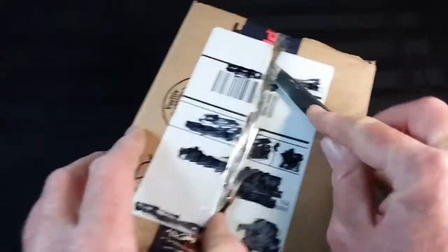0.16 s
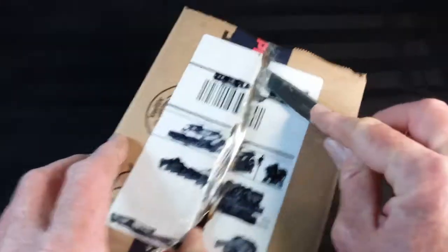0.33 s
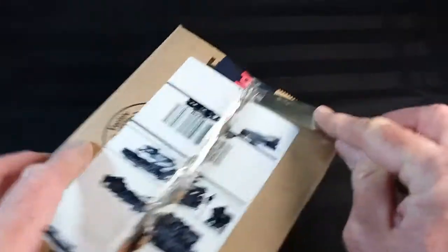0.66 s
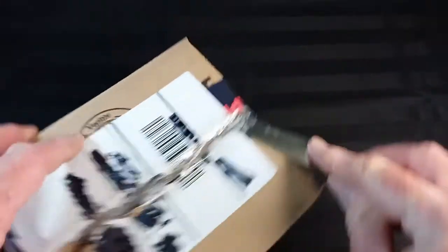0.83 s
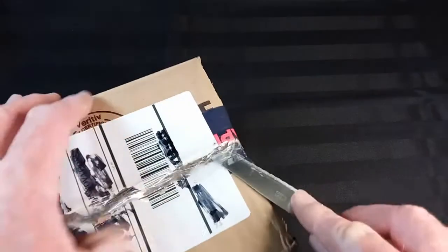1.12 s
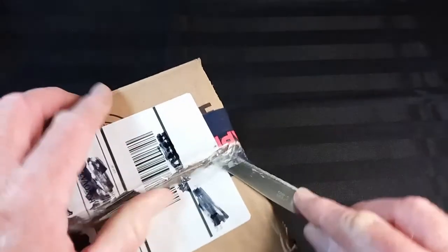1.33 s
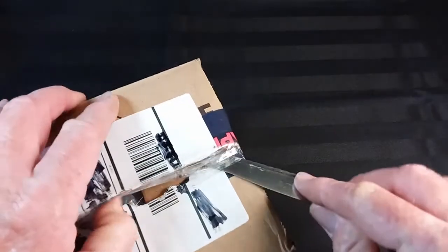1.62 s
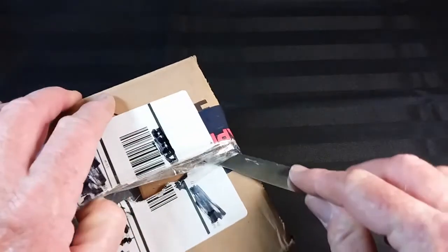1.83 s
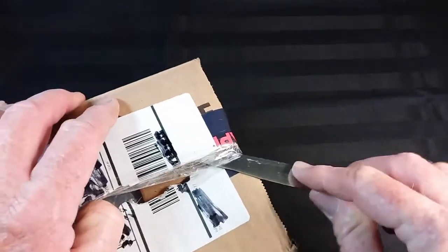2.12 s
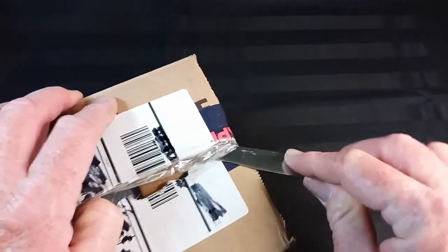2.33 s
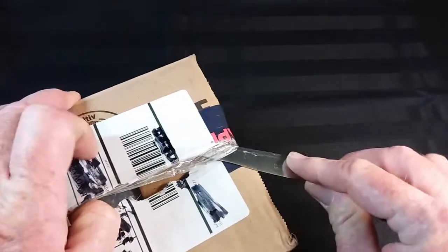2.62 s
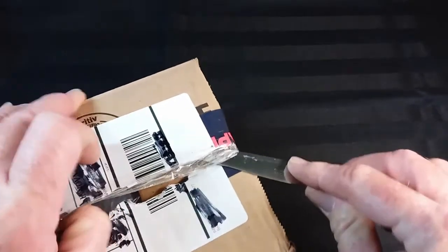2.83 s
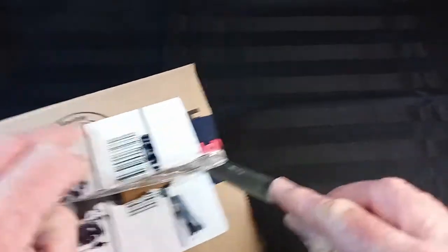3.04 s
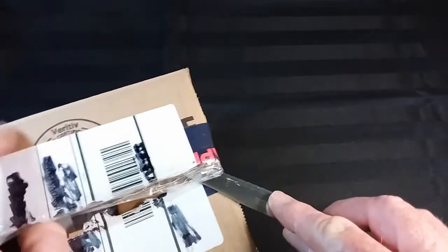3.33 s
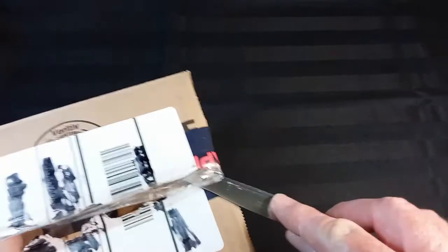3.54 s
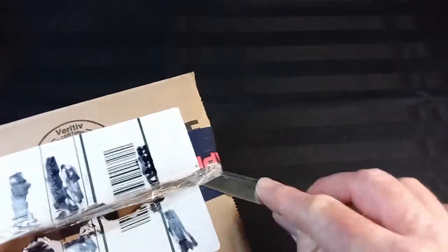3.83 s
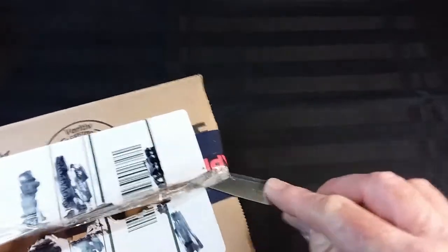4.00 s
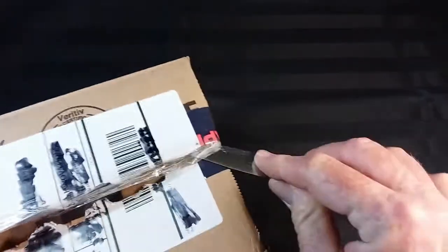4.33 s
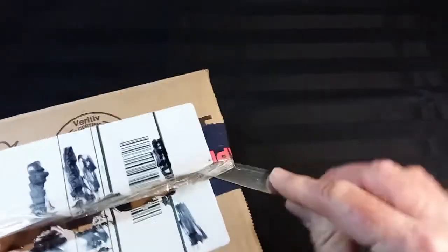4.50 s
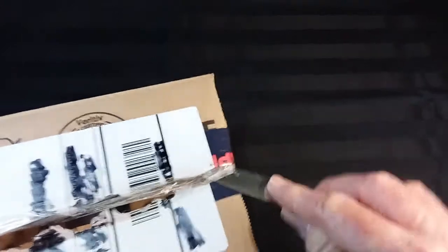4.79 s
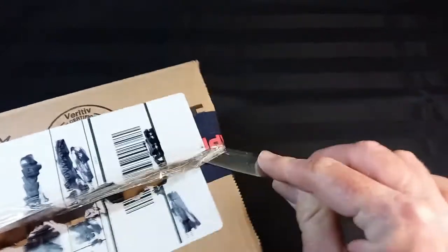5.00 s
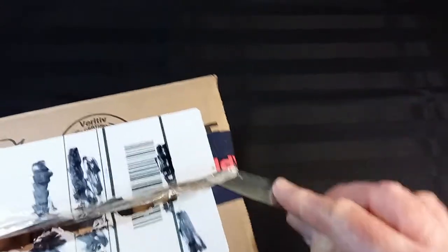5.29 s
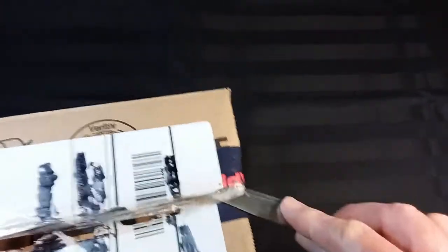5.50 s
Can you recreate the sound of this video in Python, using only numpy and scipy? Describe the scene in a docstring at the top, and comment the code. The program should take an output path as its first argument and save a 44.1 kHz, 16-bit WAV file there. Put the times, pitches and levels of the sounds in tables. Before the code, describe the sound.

Close and almost mono, in a quiet room with a very short echo, a knife blade works under packing tape on a cardboard box. From 0 to 0.5 s there are brisk scratches and hollow knocks, with bright clicks and a hard snap near 0.5. Lighter rubbing continues until a crisp snap around 0.95 and the loudest crack at about 1.2, with box bumps between. From 1.3 to 2.6 it is sparse: faint rubs, a small tick or two near 2.15. At 2.7 stronger dry scraping begins, with short rasps around 3.0-3.2 and a long drag to 3.55. Heavy hollow thumps cluster at 3.7-3.8 with snaps, then small crackles and softer scuffs follow, with a sharp tick at 4.75. Light rubbing and little pops fade on, ending with a scrape and low bump near 5.6. A low murmur and very faint, slowly rising whine lie beneath.

```python
"""In a quiet room, close to the microphone, a small knife works under clear packing tape on a cardboard box.
Blade and fingers scratch over tape and label: uneven friction noise drives film, cardboard and box.
The tape rasps, crackles and snaps in short ringing bursts; the hollow box thumps through its panel resonances.
A faint whine, a wavering sine, drifts upward over the room's murmur of filtered noise.
A short echo and tail surround the box, and the sound is almost mono."""
import sys
import numpy as np
from scipy import signal
from scipy.fft import rfft, irfft, next_fast_len
from scipy.io import wavfile
from scipy.ndimage import uniform_filter1d, map_coordinates

SR = 44100
rng = np.random.default_rng(int(sys.argv[2]) if len(sys.argv) > 2 else 0)


def waveform_to_disk(signal):
    """Save audio, clipped to [-1, 1], as 16-bit WAV at the path in sys.argv[1]."""
    frames = np.transpose(np.atleast_2d(signal))
    scaled = np.clip(frames, -1, 1) * 32767
    samples = np.round(scaled).astype(np.int16)
    wavfile.write(sys.argv[1], SR, samples)


N = 249311  # samples

# room air, tone colour: pitch_hz, level_db
AIR_COLOUR = [(25, -9), (87, 10.5), (232, -15), (400, 8.5), (700, -120)]
# thin tone before its wavering: time_s, pitch_hz, level_db
WHINE_PATH = [(0, 875, -74), (3, 880, -74), (4.8, 930, -69), (5.65, 935, -67)]
# the box is pressed or knocked: start_s, level_db (peak of the panels), pitch_hz (panel), skin_share_db
BOX_KNOCKS = [(0.168, -25, 554, 3.5), (0.208, -19.5, 486, -1.5), (0.22, -24, 227, -6),
              (0.308, -18.5, 390.5, 2.5), (0.372, -29.5, 485.4, -1), (0.958, -33, 185, 12),
              (1.019, -25, 172, -33.5), (1.057, -24, 234.2, -11), (1.092, -28, 267.5, -7),
              (1.211, -34.5, 200, 11), (1.262, -29.5, 584.6, 2.5), (1.475, -39.5, 516.5, 8.5),
              (1.498, -36.5, 514, 9), (1.508, -29.5, 550, 3.5), (1.68, -40, 320, -15),
              (2.2, -34, 296, -7.5), (2.727, -28.5, 689, 2), (3.301, -30.5, 150, 6),
              (3.697, -16, 242.1, -11.5), (3.750, -21, 222, -35), (3.764, -18.5, 252, -15.5),
              (3.805, -27, 229.5, -29), (3.927, -30.5, 250, -7), (4.241, -26.5, 195.9, -21.5),
              (4.264, -30.5, 375, -11.5), (4.427, -29.5, 693, -33), (4.56, -30, 365, 0),
              (4.741, -30, 380, -3), (4.764, -31, 204, -1), (4.809, -27.5, 684, -26.5),
              (4.904, -36.5, 340.3, 4), (5.181, -34.5, 196, -12.5), (5.305, -36, 198, -30.5),
              (5.634, -27.5, 248, -11)]
# resonances of the box panels: pitch_hz, width_hz, level_db (before the place of contact counts)
BOX_PANELS = [(151.7, 43, 8), (221.8, 38.6, 3.5), (297.4, 52, 4.5), (360, 79.6, 7), (397, 110, 1.5),
              (530.6, 35, 6.5), (714, 140, 1.5)]
# resonances of the cardboard skin: pitch_hz, width_hz, level_db
CARDBOARD_SKIN = [(514, 320, 1), (890, 272, 6.5), (1166, 156, 7), (1380, 139, 11), (1580, 1190, 1)]
# the tape lets go: start_s, level_db (peak before the hollow cut), pitch_hz (ring)
TAPE_SNAPS = [(0.0889, -16, 5340), (0.1128, -21, 884), (0.1257, -20.5, 6520), (0.312, -17, 2530),
              (0.3747, -20.5, 6400), (0.47, -18, 9080), (0.4853, -4, 9200), (0.936, -21, 7010),
              (0.9619, -10.5, 2560), (1.2148, -2.5, 3850), (1.9, -28.5, 6450), (2.076, -45.5, 2540),
              (2.142, -18.5, 2490), (2.1432, -21.5, 3700), (2.188, -31.5, 8800), (2.1951, -27.5, 2404),
              (2.7301, -17, 3000), (2.7565, -22, 3450), (3.104, -16, 3570), (3.6535, -23.5, 2976),
              (3.699, -19, 7549), (3.7722, -20, 5940), (3.865, -35.5, 4005), (3.8854, -29, 3700),
              (3.961, -28, 1300), (3.9891, -29, 3670), (4.0125, -31.5, 2530), (4.054, -25, 1265),
              (4.245, -22, 4390), (4.3831, -23.5, 3320), (4.4029, -19, 7550), (4.562, -27, 2788),
              (4.591, -34.5, 3080), (4.7432, -27.5, 3680), (4.7625, -12.5, 8040), (4.949, -24, 3030),
              (5.008, -29.5, 2520), (5.03, -26.5, 2300), (5.063, -23, 1090), (5.09, -28.5, 799),
              (5.511, -30.5, 9480), (5.585, -25, 3750)]
# short rasps of the edge across the film: start_s, length_s, level_db, pitch_hz (colour)
EDGE_RASPS = [(0.024, 0.035, -31, 13520), (0.0563, 0.005, -23, 13000), (0.33, 0.0085, -37, 3970),
              (1.804, 0.04, -52.5, 8950), (2.524, 0.084, -60, 3440), (3.0108, 0.0029, -22, 3100),
              (3.177, 0.019, -27.5, 3750), (3.203, 0.016, -30, 4300), (3.228, 0.016, -27.5, 2803)]
# each drag of blade or finger: start_s, hold_s, level_db (scratch), weight_db (on the box)
HAND_DRAGS = [(0, 0.047, -41, 2), (0.141, 0.14, -47, 3.5), (0.307, 0.03, -40, 5.5),
              (0.454, 0.066, -42.5, -3), (0.588, 0.075, -47, -10.5), (0.725, 0.16, -45.5, -12.5),
              (0.962, 0.066, -49.5, -1), (1.079, 0.12, -49.5, -4.5), (1.225, 0.066, -50, 3.5),
              (1.344, 0.147, -63, 1.5), (1.471, 0.07, -51, 3.5), (1.637, 0.072, -57.5, 1),
              (2.197, 0.01, -53.5, 9), (2.311, 0.0487, -57, -0.5), (2.415, 0.035, -52, -8),
              (2.744, .29, -40.5, -10), (2.81, 0.02, -33.5, -12.5), (3.112, 0.027, -43, -8),
              (3.188, 0.05, -34.5, -5), (3.348, 0.19, -38.5, -7.5), (3.599, 0.1242, -45, -3),
              (3.928, 0.11, -54.5, 4.5), (4.06, 0.063, -45, -1.5), (4.369, 0.024, -49, 0),
              (4.447, 0.0202, -49.5, 4), (4.563, 0.037, -50.5, 3), (4.767, 0.058, -46, -2),
              (4.878, 0.24, -54, 0), (5.203, 0.31, -52.5, -10.5), (5.597, .1, -44, 2)]
# resting hands, one level for each layer: scratch_db, rustle_db, rumble_db
RESTING_HANDS = [-67.5, -70, -67]
# film scratch, tone colour: pitch_hz, level_db
SCRATCH_COLOUR = [(1530, -14.5), (2820, 2), (4190, 1), (5530, -3), (7570, -3), (9470, 1.5), (10600, -11.5),
                  (13200, -8.5), (15500, -13)]
# hollow box rumble, tone colour: pitch_hz, level_db
RUMBLE_COLOUR = [(30, -27.5), (183, -2), (362, -8.5), (471, -9.5), (700, -14.5), (910, -17), (1540, -120)]

AIR_DB = -67.5
TOP_HZ = 15800  # band limit of the microphone
CRACK_GROWS = 0.26  # dB of broad crack over the ring per dB of peak: hard snaps are broad, soft ones ring
RISE_DB_PER_S, FALL_DB_PER_S = 448, 182.5  # a drag bites fast and trails off
SKIN_DB, SKIN_SHARE = -2.5, 0.54  # skin rustle over the scratch, and how much of the weight it feels
RATTLE_DB, RATTLE_DB_PER_S = -22, 167  # a knocked box keeps rumbling: start relative to the knock, decay
# A light rub is hollow around GAP_HZ; a rustle above TEAR_DB fills the gap.
GAP_HZ, GAP_WIDTH_HZ, GAP_DEPTH, TEAR_DB = 2030, 630, 0.95, -55.5
STEP = 64  # samples between the points of the handling curves


def amp(db):
    """Gain of a level in dB."""
    return 10 ** (np.asarray(db) / 20)


def unit(x):
    """x at rms 1."""
    return x / np.sqrt(np.mean(x ** 2) + 1e-20)


def peak(x):
    """x with its highest swing at 1."""
    return x / np.max(np.abs(x))


def add(track, s, sound):
    """Mix a sound in at time s, cut off at the end of the track."""
    part = track[round(s * SR):][:len(sound)]
    part += sound[:len(part)]


def curves(rows):
    """One value per sample for each column after the time, in straight lines."""
    s, *cols = np.transpose(rows)
    return [np.interp(np.arange(N) / SR, s, c) for c in cols]


def wobble(rate):
    """A smooth random curve with rate knots a second."""
    knots = rng.standard_normal(int(N * rate / SR) + 4)
    return map_coordinates(knots, [np.arange(N) * rate / SR])


def filtered(x, response):
    """x shaped by a complex response of frequency."""
    m = next_fast_len(x.shape[-1] + 4096)  # silence added so that ringing does not wrap round
    return irfft(rfft(x, m) * response(np.fft.rfftfreq(m, 1 / SR)), m)[..., :x.shape[-1]]


def resonances(modes):
    """Causal response of (Hz, width, dB) resonances, added with alternating sign."""
    def response(f):
        total = 0
        for k, (centre, width, db) in enumerate(modes):
            mode = 1j * f * width / (centre * centre - f * f + 1j * f * width)
            total = total + (-1) ** k * amp(db) * mode
        return total
    return response


def ring(hz, width):
    """A steep single resonance: the same one twice in a row."""
    return lambda f: resonances([(hz, width, 0)])(f) ** 2


def colour(points):
    """Causal (minimum phase) response through (Hz, dB) points, with levels held at -60 dB or more."""
    def response(hz):
        f, db = np.transpose(points)
        curve_db = np.interp(np.log(hz + 1), np.log(f), np.maximum(db, -60))
        # Folding the cepstrum onto positive times gives the minimum phase.
        ceps = irfft(np.log(amp(curve_db)))
        half = len(ceps) // 2
        ceps[1:half] *= 2
        ceps[half + 1:] = 0
        return np.exp(rfft(ceps))
    return response


def air():
    """The steady low murmur of the room: coloured noise."""
    return amp(AIR_DB) * unit(filtered(rng.standard_normal(N), colour(AIR_COLOUR)))


def room(x, t60):
    """A table-top echo and a short noise tail that falls 60 dB in t60 s, slightly different per channel."""
    t = np.arange(SR // 4) / SR
    shared, own = rng.standard_normal(len(t)), rng.standard_normal(len(t))
    tail = shared + 0.0043 * np.outer([1, -1], own)
    tail = tail * amp(-60 * t / t60) * (t > .004)
    tail = amp(-21) * tail / np.linalg.norm(tail[0])
    tail[:, round(.003 * SR)] += amp(-21.5)  # the table-top echo
    return signal.fftconvolve(x[None], tail, axes=1)[:, :N]


def whine():
    """A thin sine tone, slightly unsteady in loudness and pitch."""
    hz, db = curves(WHINE_PATH)
    level = amp(db + 4 * wobble(6))
    return level * np.sin(2 * np.pi * np.cumsum(hz + 7 * wobble(30)) / SR)


def knocks():
    """A contact shakes the box: panels tuned near the contact answer most, the skin and film crunch."""
    out, t = np.zeros(N), np.arange(SR // 6) / SR
    for s, db, hz, skin_db in BOX_KNOCKS:
        fade = np.exp(-t / 0.0039) + 0.096 * np.exp(-t / 0.035)
        push = (1 - np.exp(-t / 0.0012)) * fade * rng.standard_normal(len(t))
        push = push + 0.64 * np.exp(-t / 0.00035)  # the first touch
        # A panel loses 22 dB for each octave between it and the contact's pitch.
        near = resonances([(c, w, level - 22 * abs(np.log2(c / hz))) for c, w, level in BOX_PANELS])
        panels = peak(filtered(push, lambda f: near(f) * 1j * f / (110 + 1j * f)))
        crunch = push * np.exp(-t / 0.012)
        skin = peak(filtered(crunch, resonances(CARDBOARD_SKIN)))
        skin = skin + 0.474 * peak(filtered(crunch, colour(SCRATCH_COLOUR)))
        add(out, s + .0025, amp(db) * (panels + amp(skin_db) * skin))
    return out


def swell(s, hold, db, fall):
    """Power of one gesture: rise up to time s, hold, release, straight in dB."""
    t = np.arange(0, N, STEP) / SR
    rise_db = RISE_DB_PER_S * np.maximum(s - t, 0)
    fall_db = fall * np.maximum(t - s - hold, 0)
    return amp(db - rise_db - fall_db) ** 2


def handling():
    """Gains of scratch, rustle and rumble: powers of drags, knock rattle and resting hands add up."""
    power = amp(RESTING_HANDS)[:, None] ** 2
    for s, hold, db, weight_db in HAND_DRAGS:
        layers_db = db + np.array([0, SKIN_DB + SKIN_SHARE * weight_db, weight_db])
        power = power + swell(s, hold, layers_db[:, None], FALL_DB_PER_S)
    rattle = sum(swell(s, 0, db + RATTLE_DB, RATTLE_DB_PER_S) for s, db, *_ in BOX_KNOCKS)
    power[1:] += rattle * np.array([[0.15], [1]])  # rustle gets a little, rumble all
    return np.sqrt([np.interp(np.arange(N), np.arange(0, N, STEP), p) for p in power])


def tick(hz, crack):
    """A tiny crack, hardest at its start, rings the free film around hz and jolts the board."""
    t = np.arange(SR // 60) / SR
    burst = amp(-60 * t / .003) * rng.standard_normal(len(t))
    burst[0] = 3
    burst[rng.integers(8, 40):][:40] += 0.62 * burst[:40]  # the far edge of the film lets go a moment later
    sharp = burst - .5 * np.roll(burst, 1)  # brighter
    film = 2.02 * crack * unit(filtered(sharp, colour(SCRATCH_COLOUR)))
    film = film + unit(filtered(burst, ring(hz, 0.48 * hz)))
    return peak(film + 0.55 * unit(filtered(burst, resonances(CARDBOARD_SKIN))))


def crackle(count=420):
    """Many small creases pop at random, as loud and as dense as the handling makes them."""
    out, rustle = np.zeros(N), handling()[1]
    busy = np.cumsum(rustle ** 0.6)  # grows fastest where pops are likeliest
    for share, pitch, size in rng.random((count, 3)):
        at = np.searchsorted(busy, share * busy[-1])
        level = rustle[at] * amp(5.5 + 10 * size ** 2)
        add(out, at / SR, level * tick(900 * 9 ** pitch, crack=0.24))
    return out


def snaps():
    """The clear releases of the tape: single ticks, hollowed out around the gap."""
    out = np.zeros(N)
    for s, db, hz in TAPE_SNAPS:
        add(out, s + 0.00118, amp(db) * tick(hz, crack=amp(CRACK_GROWS * db)))
    return out - 1.1 * filtered(out, resonances([(GAP_HZ, 400, 0)]))


def rasps():
    """A quick swell of dense slips, coloured by the length of free film."""
    out = np.zeros(N)
    for s, length, db, hz in EDGE_RASPS:
        envelope = np.sin(np.pi * np.linspace(0, 1, round(length * SR)) ** 1.2) ** .5
        fibres = amp(6.7 * wobble(347)[:len(envelope)]) * rng.standard_normal(len(envelope))
        film = unit(filtered(fibres, ring(hz, 0.66 * hz)))
        skin = 0.26 * unit(filtered(fibres, resonances(CARDBOARD_SKIN)))
        add(out, s, amp(db) * envelope * unit(film + skin))
    return out


def grit(rate, smooth, lumps):
    """Stick-slip: rate tiny uneven slips a second over smooth friction noise, under a lumpy gain."""
    happens = rng.random(N) < rate / SR
    slips = happens * rng.standard_normal(N) * amp(2 * rng.exponential(size=N))
    return lumps * (unit(slips) + smooth * rng.standard_normal(N))


def patchy(x, depth_db):
    """The colour shifts as the contact moves: random gain over patches of time and frequency."""
    z = signal.stft(x, nperseg=256)[2]
    field = uniform_filter1d(rng.standard_normal(z.shape), size=9, axis=0)
    field = uniform_filter1d(field, size=16, axis=1)
    return signal.istft(z * amp(depth_db * unit(field)), nperseg=256)[1][:N]


def rubbing():
    """Friction drives film (bright), board skin (middle) and hollow box (low); all feel the same bumps."""
    scratch, rustle, rumble = handling()
    bumps = wobble(50) + wobble(160)
    film = patchy(grit(1500, smooth=2.08, lumps=amp(1.27 * bumps)), depth_db=2.5)
    skin = grit(150, smooth=1.82, lumps=amp(1.53 * bumps))
    hollow = grit(300, smooth=1.5, lumps=amp(1.5 * bumps + 2.5 * wobble(16)))
    face = scratch * unit(filtered(film, colour(SCRATCH_COLOUR)))
    face = face + rustle * unit(filtered(skin, resonances(CARDBOARD_SKIN)))
    # A light rub loses a band, which wanders between two pitches as the contact moves.
    light = GAP_DEPTH / (1 + (rustle / amp(TEAR_DB)) ** 4)
    low = filtered(face, resonances([(GAP_HZ * 0.93, GAP_WIDTH_HZ, 0)]))
    high = filtered(face, resonances([(GAP_HZ * 1.07, GAP_WIDTH_HZ, 0)]))
    drift = (1 + np.tanh(wobble(5))) / 2
    face = face - light * (drift * high + (1 - drift) * low)
    return face + rumble * unit(filtered(hollow, colour(RUMBLE_COLOUR)))


def scene():
    """Box, tape and blade, with the room's answer, the whine and the murmur."""
    near = rubbing() + rasps() + snaps() + crackle() + knocks()
    direct = near * amp([[-.04], [.04]])  # a hair louder in the second channel
    return direct + room(near, t60=.1) + whine() + air()


def record(dry):
    """The microphone thins the bass below about 60 Hz and keeps nothing above its band limit."""
    return filtered(dry, lambda hz: (1j * hz / (60 + 1j * hz)) ** 2 * (hz < TOP_HZ))


dry = scene()
out = record(dry)
waveform_to_disk(out)
```